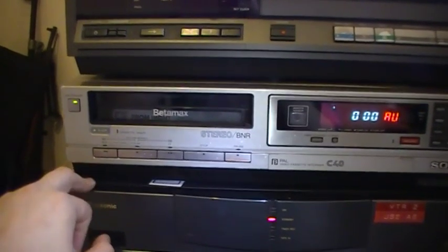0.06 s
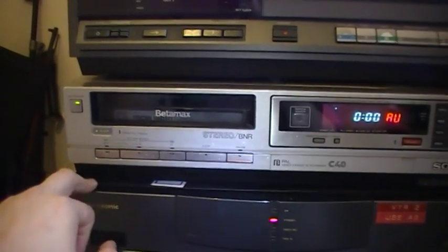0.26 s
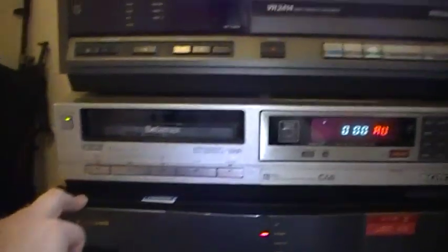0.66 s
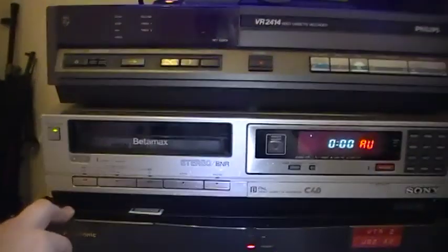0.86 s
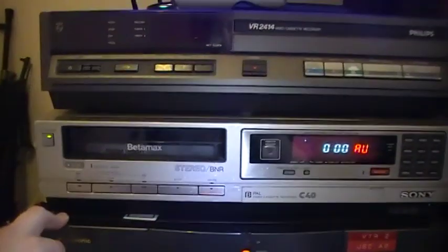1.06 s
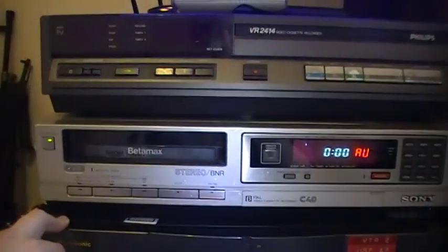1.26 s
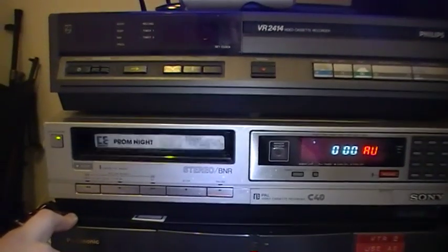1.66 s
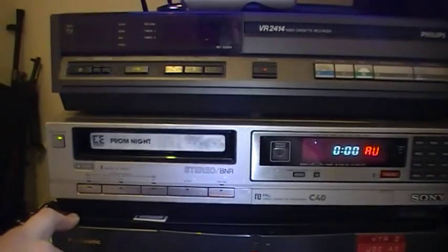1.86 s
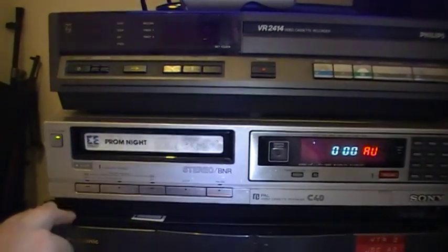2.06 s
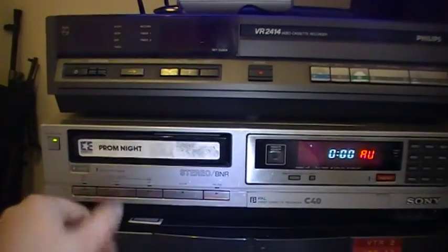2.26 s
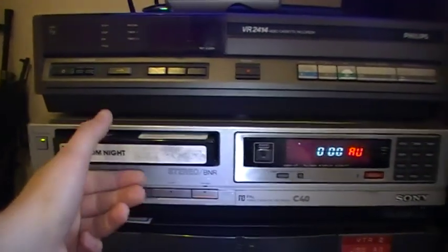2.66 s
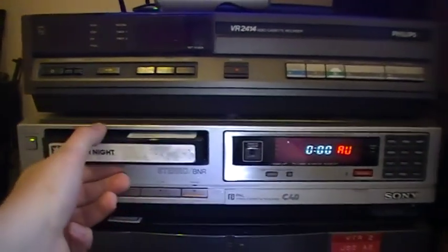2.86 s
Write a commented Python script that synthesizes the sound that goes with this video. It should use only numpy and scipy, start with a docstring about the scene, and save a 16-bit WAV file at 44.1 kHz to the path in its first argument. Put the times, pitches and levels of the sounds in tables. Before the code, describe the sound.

A video tape deck whirs, clicks and clunks as it ejects a cassette.

```python
"""A short motor whir, a latch snapping over, then a longer geared whine with clicking levers and a
rattling clunk: a tape deck ejects its cassette, close by in a small room. Brushes hiss and gears sing
in both runs; the second drives the carriage up and sags under load. Every blow rings the struck part
and the chassis. At the very end a hand slides the cassette, over faint hum and room noise."""
import sys
import numpy as np
from scipy import signal
from scipy.fft import rfft, irfft
from scipy.io import wavfile

SR = 44100
rng = np.random.default_rng(int(sys.argv[2]) if len(sys.argv) > 2 else 0)


def inscribe(sig):
    """Save sig as 16-bit PCM at rate SR to the path in sys.argv[1].

    A 1-D sig is mono; a 2-D sig holds one channel per row.
    Samples are clipped to [-1, 1] before scaling.
    """
    pcm = np.round(np.clip(np.atleast_2d(sig).T, -1, 1) * 32767)
    wavfile.write(sys.argv[1], SR, pcm.astype(np.int16))


N = 132300
T = np.arange(N) / SR
TONES_AT_DB = -45  # motor level at which a whine passes at unity gain
KNOCK_WINDOW_S = .008  # a noise burst carries the energy of its level held this long
# hiss of the motor brushes: f/Hz, density/dB
BRUSH_SPECTRUM = [(4100, -29), (4850, -2), (5500, -26), (6400, -18), (6780, 8.5), (7280, 8.5), (7600, 2.5),
                  (8200, -1.5), (8800, -28)]


def amp(db):
    """Decibels to gain."""
    return np.exp(np.asarray(db) * np.log(10) / 20)


def unit(x):
    """Scales to rms 1."""
    return x / np.sqrt(np.mean(x ** 2) + 1e-20)


def read(points, hz):
    """Reads a curve on a log-frequency axis."""
    f, value = np.transpose(points)
    return np.interp(np.log(hz + 1), np.log(f + 1), value)


def curves(table):
    """Each column of a timed table as an automation curve."""
    s, *columns = np.transpose(table)
    return [np.interp(T, s, c) for c in columns]


def colour(x, points):
    """EQ through points of f/Hz, gain/dB."""
    return irfft(rfft(x, 2 * N) * amp(read(points, np.fft.rfftfreq(2 * N, 1 / SR))))[:N]


def drift(rate_hz):
    """Smooth random modulation of rms 1, rolling off above a rate."""
    ratio = (np.fft.rfftfreq(N, 1 / SR) / rate_hz) ** 2
    return unit(irfft(rfft(rng.standard_normal(N)) / (1 + ratio * ratio), N))


def add(mix, s, sound):
    """Mixes a sound in at a time."""
    part = mix[max(round(s * SR), 0):][:len(sound)]
    part += sound[:len(part)]


def knock(levels_db, length, part_hz, part_db):
    """A blow rings a dense cluster of short plastic and metal modes, the chassis and the struck part."""
    # thump, body, clack and tick: low edge/Hz, high edge/Hz, rise/s, t60 at length factor 1/s
    bands = [(200, 406, 0.0086, 0.15), (524, 1730, 0.00083, 0.085), (1285, 3900, 0.000077, 0.11),
             (4400, 9740, 0.0015, 0.045)]
    # chassis modes: f/Hz, level relative to the blow/dB, t60/s
    chassis_modes = [(631.8, -5.5, 0.23), (894, 0.5, 0.068), (1127, -12, 0.17), (2815, -7, 0.11),
                     (3010, -19, 0.18)]
    t = T[:SR // 3]
    out = np.zeros(len(t))
    for db, (lo, hi, rise, t60) in zip(levels_db, bands):
        burst = rng.standard_normal(len(t)) * (1 - np.exp(-t / rise)) * amp(-60 * t / (t60 * length))
        cluster = signal.sosfilt(signal.butter(3, [lo, hi], "band", fs=SR, output="sos"), burst)
        out += amp(db) * unit(cluster) * np.sqrt(KNOCK_WINDOW_S / t[-1])
    force = [(np.sqrt(lo * hi), db) for (lo, hi, _, _), db in zip(bands, levels_db)]
    chassis = [(hz, db + read(force, hz), t60) for hz, db, t60 in chassis_modes]
    part_t60 = .025 + 37 / part_hz  # 25 ms plus 37 cycles
    for hz, db, t60 in chassis + [(part_hz, part_db, part_t60)]:
        detuned_hz = hz * (1 + 0.0051 * rng.standard_normal())
        envelope = amp(db - 60 * t / t60) * (1 - np.exp(-t * hz / 2))
        out += envelope * np.sin(2 * np.pi * (detuned_hz * t + rng.random()))
    return out


def snaps():
    """Tiny steel springs and switches snap with a short, bright tick."""
    # snap cues: t/s, level before EQ/dB
    cues = [(0.4658, -38.5), (0.741, -17.5), (1.4045, -28), (1.477, -26), (2.0433, -18), (2.065, -31),
            (2.409, -28.5), (2.432, -28.5), (2.607, -45.5)]
    # sheen of the steel: f/Hz, gain/dB
    steel_eq = [(4000, -14.5), (7000, -2), (8600, 2), (10200, -2), (11500, -8), (15000, -25)]
    t, out = T[:4096], np.zeros(N)
    t60 = 0.024
    for s, db in cues:
        tick = unit(rng.standard_normal(len(t)) * amp(-60 * t / t60))
        add(out, s, amp(db) * tick * np.sqrt(KNOCK_WINDOW_S / t[-1]))
    return colour(out, steel_eq)


def scrapes(rate_hz, sharp, uneven_db):
    """Envelope of one contact per cycle, each with its own strength."""
    turns = np.cumsum(rate_hz) / SR
    strength = amp(uneven_db * (2 * rng.random(N) - 1))[turns.astype(int)]
    return unit(strength * np.exp(sharp * np.cos(2 * np.pi * (turns - .5))))


def whine(hz, partials, flutter, rough):
    """Gear tones on a fluttering shaft; uneven teeth smear a share of each into a rough band."""
    turns = np.cumsum(hz * (1 + flutter * drift(47.6))) / SR
    out = np.zeros(N)
    for multiple, db in partials:
        shimmer = amp(1.6 * drift(35))
        smear_hz = 2 * np.sqrt(multiple * hz.mean())
        teeth = shimmer + rough * (drift(smear_hz) + 1j * drift(smear_hz))
        carrier = np.exp(2j * np.pi * (multiple * turns + rng.random()))
        out += amp(db) * unit((teeth * carrier).real)
    return out


def lift_motor():
    """The carriage drive sags under load; its brushes chatter and throb with a slow pulley."""
    # carriage run: t/s, gear mesh/Hz, brush level/dB, gear level/dB
    run = [(.89, 603.4, -69, -68), (.94, 791, -54, -49.5), (.99, 951, -41, -47), (1.06, 1109, -42, -45),
           (1.29, 1131, -39.5, -45), (1.38, 1085, -40, -45), (1.46, 1053, -44.5, -41),
           (1.56, 1024, -45, -43.5), (1.66, 993, -47.5, -43), (1.76, 944, -49.5, -43.5),
           (1.92, 1101, -45, -43.5), (2.13, 1142, -45, -45), (2.31, 1151, -45, -46),
           (2.545, 1145, -44.5, -46), (2.57, 1021, -75, -47.5), (2.61, 692, -79, -60)]
    # gear whine: multiple of the mesh rate, relative level/dB
    partials = [(.453, -64), (1, -55), (2, -52.5), (3, -57), (3.28, -66.5), (4, -82), (5, -68)]
    # gear rattle: f/Hz, density/dB
    rattle_spectrum = [(100, -40), (196, -2), (400, -5), (718, -2), (962, 1.5), (1210, -6), (1460, -1),
                       (1810, -3.5), (2270, -10.5), (2470, -11), (3460, -7.5), (5600, -15.5), (7050, -3),
                       (11700, -21), (15000, -57)]
    # gear housing resonances that the sagging whine sweeps through: f/Hz, gain/dB
    housing_eq = [(850, 5.5), (970, 8), (1100, -2.5), (2650, -5), (2900, 3), (3150, -6), (4500, 14),
                  (4830, 7), (5200, 3)]
    mesh_hz, brush_db, gear_db = curves(run)
    throb = scrapes(mesh_hz / 60, sharp=0.26, uneven_db=.8)
    chatter = scrapes(mesh_hz / 20, sharp=0.16, uneven_db=1)
    brush = unit(colour(throb * chatter * rng.standard_normal(N), BRUSH_SPECTRUM)) * amp(brush_db)
    rattle = scrapes(mesh_hz * .15, sharp=0.066, uneven_db=3.0) * rng.standard_normal(N)
    gears = unit(colour(rattle, rattle_spectrum)) * amp(gear_db)
    tones = whine(mesh_hz, partials, flutter=0.008, rough=0.52)
    housed_tones = colour(tones, housing_eq) * amp(gear_db - TONES_AT_DB)
    return (brush + housed_tones + gears) * (T > run[0][0]) * (T < run[-1][0])


def unload_motor():
    """The opening whir: brushes scrape once a turn and throb with a pulley; gears rattle and whine."""
    # unloading run: t/s, shaft speed/Hz, brush level/dB, gear level/dB
    run = [(0, 87.4, -46.5, -45.5), (.13, 90.12, -42.5, -46.5), (.42, 90.06, -44, -46.5),
           (.525, 90.5, -47.5, -46.5), (.55, 87, -66, -55), (.6, 65, -74, -77)]
    # gear whine: multiple of the shaft speed, relative level/dB
    partials = [(2.1, -55.5), (4, -57), (10, -51.5), (13, -60.5), (20.2, -64), (21.35, -50.5),
                (30.45, -55.5), (32.3, -52), (36.6, -60)]
    # gear rattle: f/Hz, density/dB
    rattle_spectrum = [(100, -24), (170, -9.5), (324, -10), (359, -14), (570, -10), (885, -6),
                       (1070, -12.5), (2090, -10), (2860, -13.5), (5720, -19), (7050, -13), (15000, -37.5)]
    shaft_hz, brush_db, gear_db = curves(run)
    throb = scrapes(shaft_hz / 3, sharp=0.42, uneven_db=1.2)
    chatter = scrapes(shaft_hz, sharp=0.3, uneven_db=1.5)
    brush = unit(colour(throb * chatter * rng.standard_normal(N), BRUSH_SPECTRUM)) * amp(brush_db)
    rattle = scrapes(shaft_hz * 2, sharp=0.17, uneven_db=3.0) * rng.standard_normal(N)
    gears = unit(colour(rattle, rattle_spectrum)) * amp(gear_db)
    tones = whine(shaft_hz, partials, flutter=.009, rough=0.9) * amp(brush_db - TONES_AT_DB)
    return (brush + tones + gears) * (T < run[-1][0])


def cassette_slide():
    """The shell scuffs in its slot as a hand slides it."""
    # swell of the scuff: t/s, level/dB
    swell = [(2.945, -78), (2.96, -48), (2.975, -48.5), (3.0, -37)]
    # friction of the shell: f/Hz, density/dB
    scuff_spectrum = [(88, -33), (150, -6), (566, -12), (860, 4), (1190, -7), (1870, -6.5), (6940, -17),
                      (14000, -32)]
    grain = rng.standard_normal(N) * amp(1.3 * drift(190))
    return amp(curves(swell)[0]) * (T > swell[0][0]) * unit(colour(grain, scuff_spectrum))


def room(x):
    """The small room's diffuse tail, with the lows hanging on longest."""
    # reverb decay: f/Hz, t60/s
    decay = [(150, 0.9), (1000, 0.32), (6000, 0.3), (13000, 0.21)]
    hz, t, noise = signal.stft(rng.standard_normal(SR // 2), SR, nperseg=256)
    envelope = amp(-60 * t / read(decay, hz)[:, None]) * np.minimum(t / 0.0071, 1)
    tail = signal.istft(noise * envelope, SR, nperseg=256)[1]
    return signal.fftconvolve(x, tail / np.linalg.norm(tail))[:N]


def background():
    """The wavering hum of the idling deck, a deep rumble that swells late, and room noise."""
    # deck hum: f/Hz, level/dB
    hum_tones = [(125, -64.5), (190, -61.5)]
    # swell of the rumble: t/s, level/dB
    rumble_swell = [(1.9, -75.5), (2.85, -63)]
    # room noise: f/Hz, density/dB
    floor_spectrum = [(30, -11), (80, -4), (130, 5), (300, 5.5), (700, 0), (1800, -3), (4000, -18.5),
                      (9000, -18.5), (15000, -37)]
    hum = np.zeros(N)
    for hz, db in hum_tones:
        waver = amp(2.9 * drift(4.3))
        turns = np.cumsum(hz + 3 * drift(12.3)) / SR
        hum += amp(db) * unit(waver * np.sin(2 * np.pi * turns))
    low_band = (drift(14) + 1j * drift(27)) * np.exp(2j * np.pi * 42.5 * T)  # noise around 42.5 Hz
    rumble = unit(low_band.real) * amp(curves(rumble_swell)[0])
    return hum + rumble + amp(-55.5) * unit(colour(rng.standard_normal(N), floor_spectrum))


def scene():
    """The deck is straight ahead; the room rings after its knocks and scatters a little to the sides."""
    # blows of latches, levers and cassette:
    # t/s, thump/dB, body/dB, clack/dB, tick/dB, length factor, struck part's ring/Hz, ring level/dB
    blows = [(0.535, -46, -45, -62, -68, 1.7, 692, -38), (0.5562, -36.5, -35, -38.5, -42, 0.9, 400, -35),
             (0.7141, -62, -43, -45, -45, 3.6, 880, -52), (0.727, -51, -42, -30, -30.5, 2.2, 858, -22),
             (0.7413, -32.5, -25, -22, -23, 0.99, 262, -30.5), (1.3045, -43, -52, -66, -46, 0.87, 670, -34),
             (1.404, -40, -33, -36, -30.5, 1, 348, -32.5),
             (1.8111, -45, -32, -38.5, -43, 1.1, 347.2, -27.5),
             (1.8225, -48, -36, -38.5, -39.5, 0.46, 2730, -30),
             (1.887, -36.5, -38, -33.5, -38, 0.71, 706.5, -26.5),
             (1.897, -64, -39, -63, -50, 0.6, 873, -24), (2.0427, -41, -39, -43, -27, 0.38, 5990, -19.5),
             (2.052, -37.5, -35.5, -37, -55, 1.7, 517, -34), (2.372, -34.5, -34, -39, -36.5, 1, 243, -38),
             (2.424, -52, -40.5, -42.5, -50, 0.69, 400, -44),
             (2.6144, -57, -55, -44, -47.5, 3.1, 5025, -42), (2.652, -36, -41, -35.5, -25.5, 1, 6500, -22),
             (2.657, -39, -38, -33.5, -27.5, 1.2, 1654, -30),
             (2.667, -36.5, -38, -29.5, -28.5, 0.7, 357, -28), (2.683, -40, -36.5, -41, -53, 1.9, 242, -35),
             (2.8909, -55, -45, -46, -52, 0.29, 1133, -43),
             (2.9496, -69, -44.5, -42.5, -47, 0.4, 3540, -44)]
    # stereo width: f/Hz, side gain/dB
    side_eq = [(60, -2.5), (200, -6), (1400, -12), (2800, -8.5), (6000, -14.5), (10000, -7.5)]
    # stereo balance: f/Hz, left minus right/dB
    balance = [(150, -2.5), (6000, 0.45)]
    knocks = snaps()
    for s, *levels_db, length, part_hz, part_db in blows:
        add(knocks, s, knock(levels_db, length, part_hz, part_db))
    deck = knocks + unload_motor() + lift_motor() + cassette_slide()
    mid = deck + amp(-10.5) * room(knocks) + background()
    scatter = rng.standard_normal(SR // 4) * np.exp(-T[:SR // 4] / 0.038)
    reflections = signal.fftconvolve(deck, scatter / np.linalg.norm(scatter))[:N]
    side = colour(reflections + background(), side_eq)
    left = colour(mid + side, [(hz, db / 2) for hz, db in balance])
    right = colour(mid - side, [(hz, -db / 2) for hz, db in balance])
    return np.array([left, right])


def record(dry):
    """The microphone dulls the top octave above a small peak; a steep high cut follows."""
    microphone_eq = [(10500, -2.5), (12500, 1.5), (15500, -17)]  # f/Hz, gain/dB
    dull = np.array([colour(channel, microphone_eq) for channel in dry])
    high_cut = signal.firwin(511, 15850, window=("kaiser", 9), fs=SR)
    return signal.oaconvolve(dull, high_cut[None], "same")


dry = scene()
out = record(dry)
inscribe(out)
```